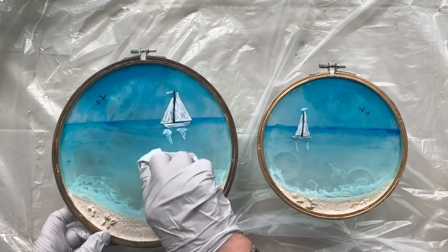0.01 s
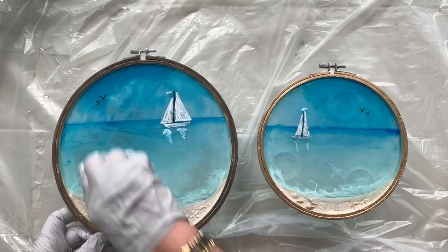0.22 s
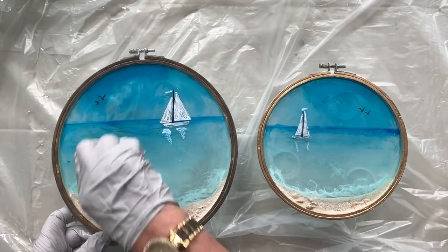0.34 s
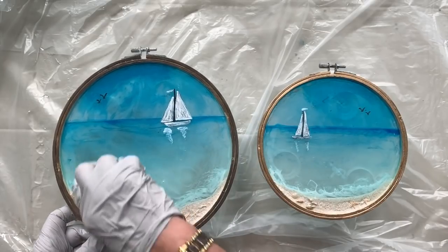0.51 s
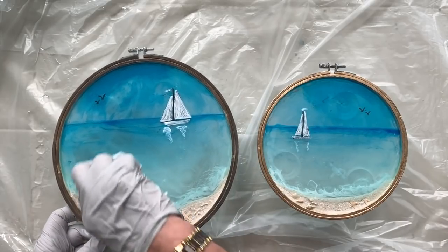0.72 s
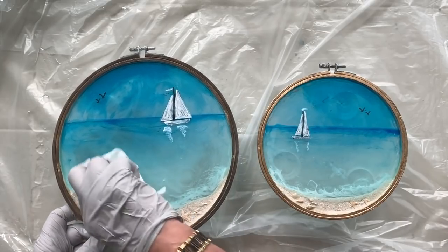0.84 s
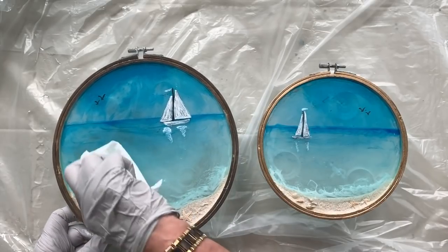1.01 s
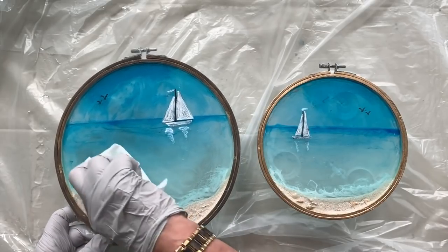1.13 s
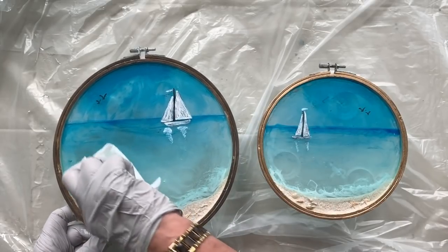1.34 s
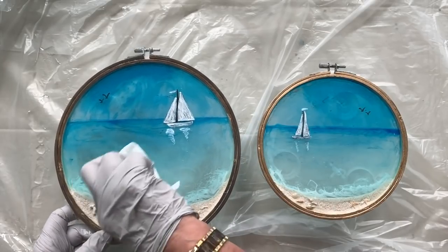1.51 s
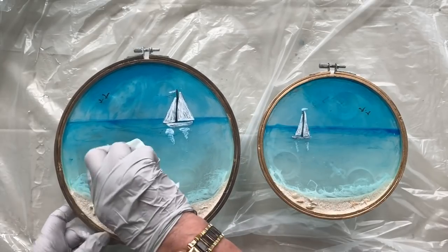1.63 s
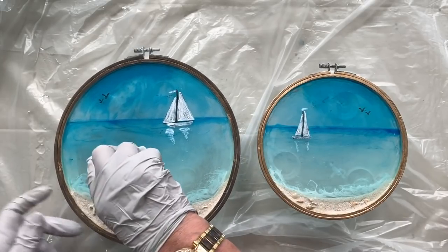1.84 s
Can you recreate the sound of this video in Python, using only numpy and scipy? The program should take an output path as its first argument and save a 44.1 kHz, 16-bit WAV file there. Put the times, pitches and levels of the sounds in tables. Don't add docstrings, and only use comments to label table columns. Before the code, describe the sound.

Wooden hoop knocks and rattles on a table as a cloth rubs its resin disc

```python
import sys
import numpy as np
from scipy import signal
from scipy.fft import rfft, irfft
from scipy.io import wavfile

SR = 44100
rng = np.random.default_rng(int(sys.argv[2]) if len(sys.argv) > 2 else 0)


def volts_from_db(level):
    exponent = np.asarray(level, float) / 20
    return 10 ** exponent


def generate_wav(sig):
    pcm = np.round(np.clip(np.atleast_2d(sig).T, -1, 1) * 32767).astype(np.int16)
    wavfile.write(sys.argv[1], SR, pcm)


N = 81585

# (frequency [Hz], level [dB], T60 [s])
HOOP_MODES = [(437, -28.5, 0.087), (644, -17, 0.03), (820, -5.5, 0.017), (929, 7.5, 0.017),
              (1173, -10, 0.021), (1427, -11, 0.017), (1767, -15.5, 0.01), (2320, -46.5, 0.042),
              (557, -13.5, 0.027)]
# (frequency [Hz], level [dB], T60 [s])
TABLE_MODES = [(72.4, -8, 0.18), (105.3, 2, 0.14), (122.3, -7, 0.09), (164, -9.5, 0.04),
               (233.3, -11.5, 0.051), (329, -13, 0.055)]


def in_time(rows):
    s, db = np.transpose(rows)
    return np.interp(np.arange(N) / SR, s, db)


def unit(x):
    return x / np.sqrt(np.mean(x ** 2) + 1e-20)


def shaped(x, points):
    hz, db = np.transpose(points)
    f = np.maximum(np.fft.rfftfreq(2 * N, 1 / SR), 1)
    gain = volts_from_db(np.interp(np.log(f), np.log(np.maximum(hz, 1)), db))
    return irfft(rfft(x, 2 * N) * gain)[..., :N]


def soft(x, hz):
    r = np.exp(-2 * np.pi * hz / SR)
    return signal.lfilter([1 - r], [1, -2 * r, r * r], x) * (1 - r)


def ring(x, hz, t60):
    r = volts_from_db(-60 / (t60 * SR))
    w = 2 * np.pi * hz / SR
    return signal.lfilter([0, np.sin(w)], [1, -2 * r * np.cos(w), r * r], x + 1e-18)


def grains(per_s, spread_db):
    hits = rng.random(N) < per_s / SR
    size = volts_from_db(spread_db * np.minimum(rng.exponential(1, N), 4))
    return hits * size * rng.choice([-1, 1], N)


def struck(s, db, modes, vary_db):
    out = np.zeros(N)
    vary = rng.normal(0, 1, (len(s), len(modes)))
    for k, (hz, level_db, t60) in enumerate(modes):
        clicks = np.zeros(N)
        np.add.at(clicks, (s * SR).astype(int), volts_from_db(db + level_db + vary_db * vary[:, k]))
        out += ring(clicks, hz, t60)
    return out


def arch(s, length):
    return np.sin(np.pi * np.clip((np.arange(N) / SR - s) / length, 0, 1))


def placed(s, wave):
    return np.pad(wave, (int(s * SR), N))[:N]


def floor():
    hum, air = rng.standard_normal((2, N))
    low = unit(ring(hum, hz=59, t60=0.096) + 0.5 * ring(hum, hz=98, t60=0.047))
    return volts_from_db(-50.5) * low + volts_from_db(-70.5) * air


def squeak():
    start_s, length_s, hz, t60_s, level_db = 0.345, 0.14, 1330, 0.012, -61
    tone = ring(ring(rng.standard_normal(N), hz, t60_s), hz, t60_s)
    return volts_from_db(level_db) * arch(start_s, length_s) * unit(tone)


def shake(modes, per_s, spread_db):
    return unit(sum(volts_from_db(0.36 * db) * ring(grains(per_s, spread_db), hz, t60) for hz, db, t60 in modes))


def shudder():
    # (time [s], level [dB])
    press_rows = [(0, -78), (.05, -56.5), (.11, -89), (.15, -80), (.2, -59.5), (.26, -64.5), (.31, -56),
                  (.37, -73.5), (.44, -76), (.47, -47), (.7, -43.5), (.97, -49.5), (1.12, -45.5),
                  (1.3, -46), (1.42, -47.5), (1.5, -49), (1.6, -60.5), (1.85, -79.5)]
    hoop_db, rumble_db, body_db, rasp_db = 4.5, 8, 0.5, -14.5
    scuff_start_s, scuff_length_s, scuff_db = 0.024, 0.094, -45

    press = volts_from_db(in_time(press_rows))
    hoop = soft(shake(HOOP_MODES, per_s=225, spread_db=2.5), hz=2600)
    middle_modes = TABLE_MODES[3:6] + HOOP_MODES[:2] + HOOP_MODES[-1:]
    body = shake(middle_modes, per_s=520, spread_db=9.0)
    rumble = shake(TABLE_MODES[:3], per_s=290, spread_db=3.5)
    rasp = unit(ring(rng.standard_normal(N), hz=2200, t60=0.00031))
    scuff = volts_from_db(scuff_db) * arch(scuff_start_s, scuff_length_s)

    pressed = volts_from_db(rasp_db) * rasp + volts_from_db(hoop_db) * hoop + volts_from_db(rumble_db) * rumble
    return press * pressed + (volts_from_db(body_db) * press + scuff) * body


def thuds():
    # (time [s], peak level [dB])
    landings = [(.06, -41), (0.078, -38), (.206, -36), (.508, -29.5), (0.533, -30.5), (.612, -28),
                (.7, -35), (.795, -27), (.858, -27.5), (0.922, -24.5), (.95, -26), (1.189, -23),
                (1.232, -25.5), (1.288, -33.5), (1.337, -29.5), (1.479, -20), (1.537, -32.5)]
    top_hz, end_hz, sag_s, rise_s = 350.4, 133, 0.01063, 0.0077
    out = np.zeros(N)
    u = np.arange(4096) / SR
    shape = u / rise_s * np.exp(1 - u / rise_s)
    vary = rng.normal(0, 1, len(landings))
    for (s, db), chance in zip(landings, vary):
        hz = end_hz + (top_hz * (1 + 0.11 * chance) - end_hz) * np.exp(-u / sag_s)
        out += placed(s, volts_from_db(db) * shape * np.sin(2 * np.pi * np.cumsum(hz) / SR))
    return out


def booms():
    # (time [s], peak level [dB], share of the free ring time [ratio])
    pushes = [(0.029, -42, 0.68), (0.073, -37, 0.96), (0.213, -21.5, .45), (0.269, -37, 0.88),
              (.31, -22, 0.73), (0.366, -41.5, .9), (0.506, -21.5, 0.58), (0.542, -20.5, 0.4),
              (0.61, -18.5, 0.74), (0.681, -22.5, 0.77), (0.722, -28, 1), (0.802, -18, 0.58),
              (0.861, -18, 0.84), (0.886, -23.5, 1), (0.933, -14.5, 0.49), (0.971, -19.5, 0.43),
              (1.013, -28.5, 0.64), (1.11, -28.5, 0.74), (1.196, -14, 0.6), (1.236, -17, 1),
              (1.295, -18.5, 1), (1.345, -20.5, 0.73), (1.06, -31, 0.98), (1.429, -36.5, .7),
              (1.489, -15.5, 0.37), (1.509, -20, 0.85), (1.546, -24, 0.6), (1.678, -46.5, 0.78),
              (1.62, -39, .9), (1.77, -52, 0.48), (1.835, -52, 0.62)]
    push_db, contact_hz, build_t60_s, vary_db = -2, 274, 0.087, 2.17
    out = np.zeros(N)
    click = np.eye(1, 16384)[0]
    vary = rng.normal(0, 1, (len(pushes), len(TABLE_MODES)))
    for (s, db, hold), chances in zip(pushes, vary):
        wave = np.zeros(len(click))
        for (hz, level_db, t60), chance in zip(TABLE_MODES, chances):
            free = ring(click, hz, t60 * max(hold, 0.1))
            wave += volts_from_db(level_db + vary_db * chance) * ring(free, hz, build_t60_s)
        out += placed(s, volts_from_db(db + push_db) * 40 / build_t60_s / SR * wave)
    return soft(out, contact_hz)


def hiss(colour):
    fibres = unit(grains(per_s=1500, spread_db=4.5))
    return unit(shaped(rng.standard_normal(N) + 0.7 * fibres, colour))


def cloth():
    # (time [s], level [dB])
    slide_rows = [(0, -64), (.17, -89), (.24, -79.5), (.3, -54), (.37, -76), (.44, -68), (.46, -59.5),
                  (.95, -56), (1.0, -66.5), (1.16, -53.5), (1.38, -64), (1.48, -47), (1.53, -79),
                  (1.85, -76)]
    # (time [s], level [dB])
    wipe_rows = [
        (1.605, -74),
        (1.63, -46),
        (1.7, -45),
        (1.74, -40.5),
        (1.79, -47.5),
        (1.825, -62),
        (1.85, -75),
    ]
    # (time [s], peak level [dB], rise [s], fall [s], plastic crinkle [dB])
    catches = [(.012, -54.5, 0.0028, 0.0025, 21.5), (0.028, -70, 0.0033, 0.14, 13),
               (0.451, -38.5, 0.00024, 0.003, -10), (0.517, -38.5, 0.0048, 0.0053, -10),
               (0.595, -52, 0.00076, 0.0045, 0), (0.661, -44.5, 0.0095, 0.0043, -2),
               (0.758, -39.5, 0.0032, 0.004, -7), (0.842, -43, 0.0019, 0.0061, -13),
               (0.907, -50, 0.0025, .004, -8), (0.917, -38.5, 0.0042, 0.0045, -15),
               (1.006, -35.5, .015, 0.0087, -11.5), (1.074, -35.5, 0.0084, 0.0099, -8),
               (1.228, -43.5, 0.0025, 0.0053, -15), (1.283, -41.5, 0.0057, 0.0034, -26),
               (1.579, -67, 0.00054, 0.0025, 5), (1.765, -42, 0.0021, 0.0011, 4),
               (1.792, -42, 0.0004, 0.0017, 0.5)]
    # (frequency [Hz], density [dB per Hz])
    slide_colour = [(900, -1.5), (2200, -10), (3500, -5), (5000, -4.5), (7000, -6), (9700, -10.5),
                    (12000, -11), (14000, -19)]
    # (frequency [Hz], density [dB per Hz])
    wipe_colour = [(700, -20), (1200, -7.5), (2200, -5.5), (3500, -9), (5000, -1), (7000, -6.5),
                   (9700, -3.5), (11800, -7.5), (14000, -22.5)]
    # (frequency [Hz], density [dB per Hz])
    catch_colour = [(900, 8.5), (2200, -1), (3500, -4.5), (5000, 7), (7000, -3.5), (9700, -6.5),
                    (12000, -18), (14000, -22)]
    # (frequency [Hz], density [dB per Hz])
    crinkle_colour = [(6000, -35.5), (8500, -8.5), (10000, 2.5), (11700, -5.5), (13000, -11.5),
                      (14500, -20)]
    catch_db = 3.5

    t = np.arange(N) / SR
    burst, crinkle = np.zeros(N), np.zeros(N)
    for s, db, rise_s, fall_s, plastic_db in catches:
        rise_s, fall_s = max(rise_s, 2e-4), max(fall_s, 5e-4)
        u = t - s - rise_s
        shape = volts_from_db(db + catch_db) * np.exp(np.where(u < 0, -3 * (u / rise_s) ** 2, -u / fall_s))
        burst += shape
        crinkle += volts_from_db(plastic_db) * shape

    uneven = volts_from_db(2.4 * unit(soft(rng.standard_normal(N), hz=29)))
    slide = volts_from_db(in_time(slide_rows)) * uneven * hiss(slide_colour)
    wipe = volts_from_db(in_time(wipe_rows)) * uneven ** 0.84 * hiss(wipe_colour)
    return slide + wipe + burst * hiss(catch_colour) + crinkle * hiss(crinkle_colour)


def taps():
    # (time [s], peak level [dB], rim pitch [Hz], other modes [dB])
    tap_rows = [(0.185, -23.5, 860, -1), (0.203, -23.5, 905, 1.5), (0.238, -37, 895, -13),
                (0.279, -41, 940, -12), (0.453, -30.5, 805, 1), (0.485, -16, 936, -4),
                (0.495, -24, 907, 7.5), (0.533, -9, 868, -7), (0.558, -21, 861, -22),
                (0.565, -24, 895, -2.5), (0.602, -31, 940, -2.5), (0.635, -23, 929, -2.5),
                (0.665, -24, 900, -17), (0.688, -17.5, 838, -2.5), (0.763, -21.5, 860, -6),
                (0.787, -11.5, 880, 0.5), (0.838, -16.5, 940, -0.5), (0.852, -12.5, 850, 1.5),
                (0.917, -1.5, 906, 0), (0.95, -22, 954, 6.5), (0.96, -21, 840, 0), (1.024, -22.5, 807, -8),
                (1.038, -21, 830, 0), (1.15, -16, 929, 0), (1.183, -10.5, 822, -3),
                (1.225, -9.5, 932, -1.5), (1.287, -2.5, 861, 1.5), (1.336, -13.5, 948, 3),
                (1.477, -15, 853, -0.5), (1.495, -19.5, 895, 1.5)]
    # (time [s], peak level [dB], rim pitch [Hz])
    more_tap_rows = [(.016, -52, 890), (0.172, -43, 800), (.650, -20.5, 890), (0.697, -19, 929),
                     (.729, -34, 830), (.793, -15.5, 912), (.858, -17.5, 858), (.924, -20, 924),
                     (1.014, -26, 922), (1.067, -31.5, 790), (1.08, -27.5, 930), (1.086, -26.5, 890),
                     (1.189, -14, 912), (1.203, -18, 840), (1.228, -14.5, 898), (1.295, -18.5, 995),
                     (1.327, -24.5, 903), (1.527, -30.5, 840)]
    # (time [s], peak level [dB], pitch [Hz])
    tick_rows = [(.0538, -57, 2050), (.204, -40, 1670), (0.797, -25, 1400), (1.08, -33.5, 1500),
                 (1.338, -27, 1790), (0.298, -41, 1660), (0.602, -37, 1430), (0.701, -28, 1540),
                 (.836, -28.5, 1570), (.919, -24.5, 2290), (0.948, -27, 1680), (1.1913, -30.5, 1930),
                 (1.23, -26, 1510), (1.284, -20.5, 1670), (1.4416, -33, 1640)]
    rim_peak_s, rim_db, more_tap_modes_db = 0.0022, -2, -2
    tick_swell_s, tick_t60_s = 0.00051, 0.015
    touch_gap_s, touch_jitter_s, touch_db = 0.001111, 5e-4, -7

    rows = np.array(list(tap_rows) + [(*row, more_tap_modes_db) for row in more_tap_rows])
    u = np.arange(2048) / SR
    out = np.zeros(N)
    swell = (u / rim_peak_s * np.exp(1 - u / rim_peak_s)) ** 2
    for s, db, hz, _ in rows:
        out += placed(s, volts_from_db(db + rim_db) * swell * np.sin(2 * np.pi * hz * u))
    for s, db, hz in tick_rows:
        shape = volts_from_db(db - 60 * u / tick_t60_s) * (1 - np.exp(-2 * u / tick_swell_s))
        out += placed(s, shape * np.sin(2 * np.pi * hz * u))

    jitter_s = touch_jitter_s * abs(rng.normal(0, 1, (len(rows), 4)))
    touch_s = rows[:, :1] + np.arange(4) * touch_gap_s + jitter_s
    level_db = rows[:, 1:2] + rows[:, 3:] + np.array([0.5, 0.5, -6.0, -4.5]) + touch_db
    other_modes = HOOP_MODES[:3] + HOOP_MODES[4:]
    touches = struck(touch_s.ravel(), level_db.ravel(), other_modes, vary_db=4.0)
    return out + soft(soft(touches, hz=1500), hz=2960)


def ports(x):
    # (frequency [Hz], phase [rad])
    phase_rows = [(0, 0), (2300, .5), (4900, 3.1), (6500, 6.15), (7800, 6.45), (9150, 9.3), (10300, 9.55),
                  (11800, 12.45), (13200, 12.7), (14200, 15.0)]
    # (frequency [Hz], level [dB])
    balance_rows = [(40, -1.2), (100, -2.2), (1600, -2.6), (3000, -4.5), (4500, -3), (6000, 0), (14000, 0)]
    # (frequency [Hz], level [dB])
    room_rows = [(60, -22), (300, -12), (1000, -10), (2000, -2), (3300, -3), (5200, -12), (6600, -28),
                 (9000, -34)]
    room_decay_s = 0.04

    f = np.fft.rfftfreq(2 * N, 1 / SR)
    hz, turn = np.transpose(phase_rows)
    lead = np.exp(0.5j * np.interp(f, hz, turn))
    left, right = irfft(rfft(x, 2 * N) * np.array([lead, lead.conj()]))[:, :N]
    left = shaped(left, [(h, d / 2) for h, d in balance_rows])
    right = shaped(right, [(h, -d / 2) for h, d in balance_rows])

    tail = rng.standard_normal((2, 6000)) * np.exp(-np.arange(6000) / SR / room_decay_s)
    tail /= np.sqrt((tail ** 2).sum(axis=1, keepdims=True))
    reflected = signal.fftconvolve(x[None], tail, axes=1)[:, :N]
    return np.array([left, right]) + shaped(reflected, room_rows)


def scene():
    return ports(floor() + squeak() + shudder() + thuds() + booms() + cloth() + taps())


def roll_off(x):
    return signal.sosfilt(signal.butter(12, 14850, fs=SR, output="sos"), x)


def record(dry):
    x = signal.sosfilt(signal.cheby2(10, 60, 18200, fs=SR, output="sos"), dry)
    x = signal.sosfilt(signal.butter(4, 46, "high", fs=SR, output="sos"), x)
    return roll_off(x)


dry = scene()
out = record(dry)
generate_wav(out)
```